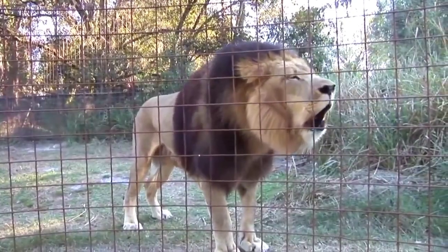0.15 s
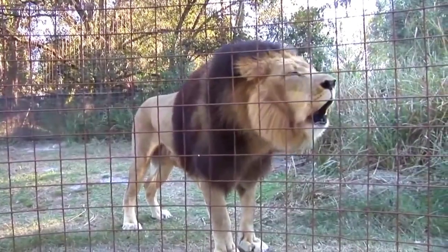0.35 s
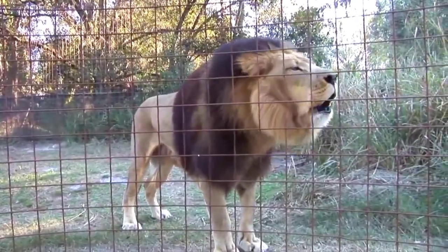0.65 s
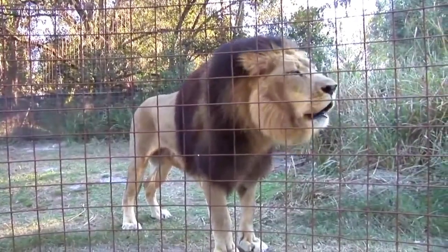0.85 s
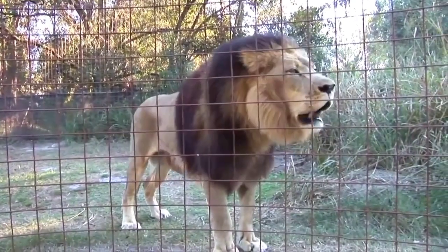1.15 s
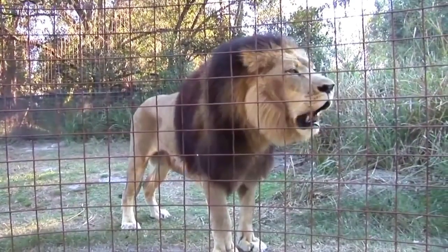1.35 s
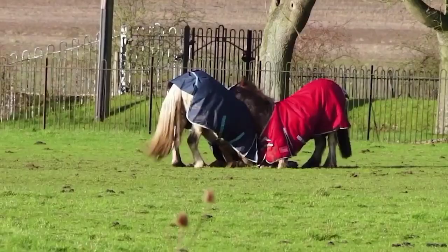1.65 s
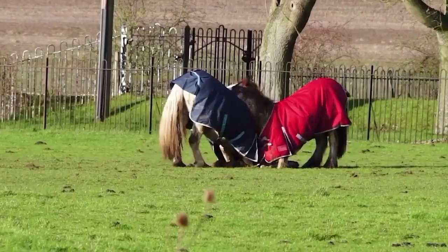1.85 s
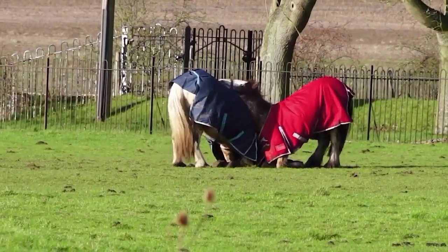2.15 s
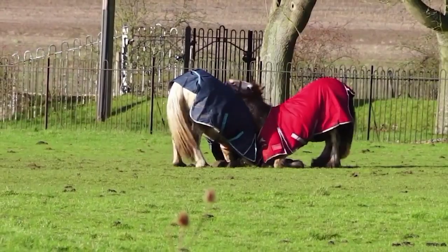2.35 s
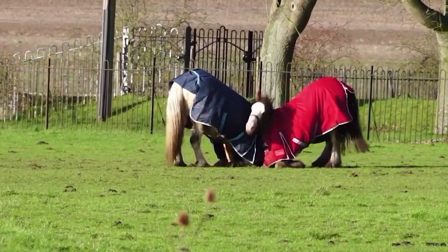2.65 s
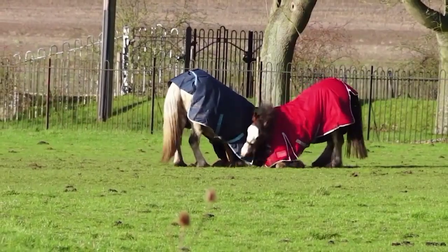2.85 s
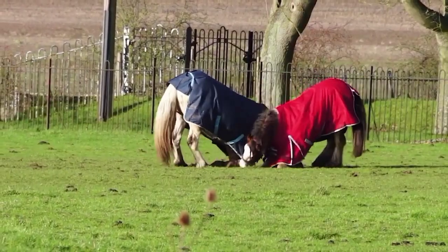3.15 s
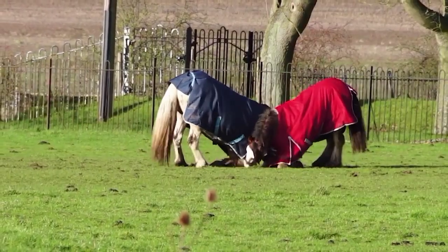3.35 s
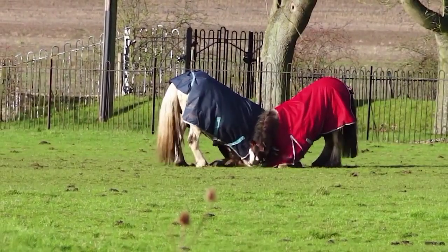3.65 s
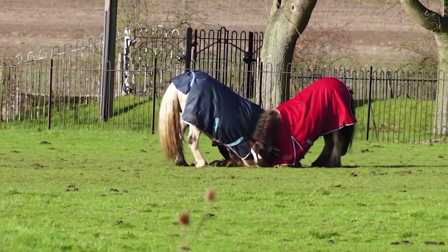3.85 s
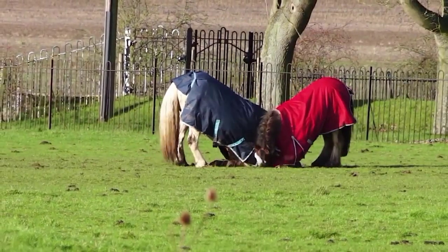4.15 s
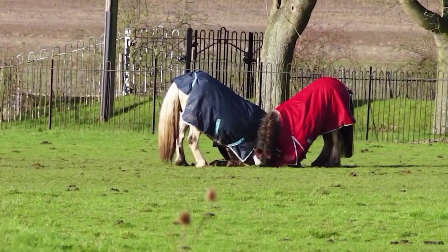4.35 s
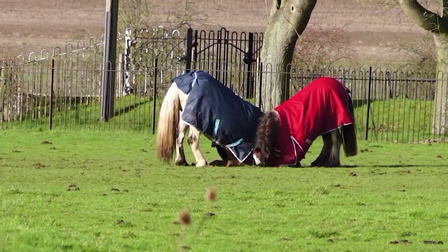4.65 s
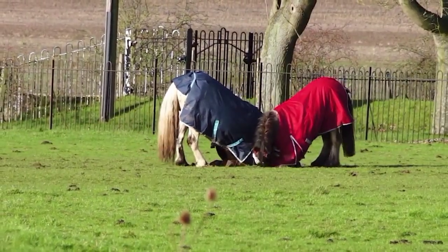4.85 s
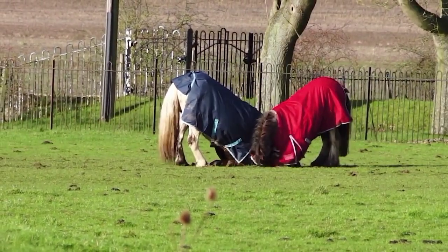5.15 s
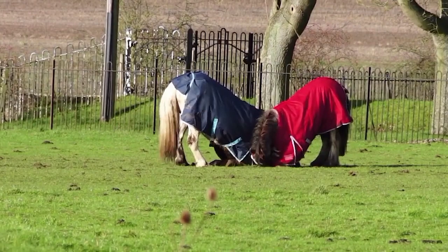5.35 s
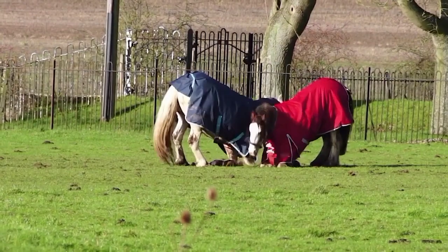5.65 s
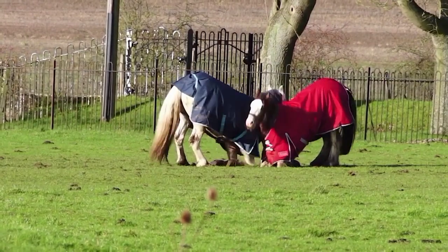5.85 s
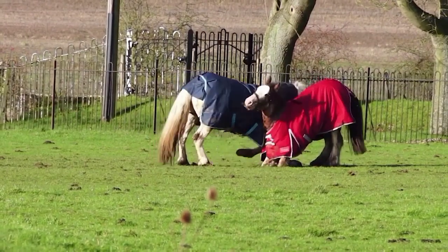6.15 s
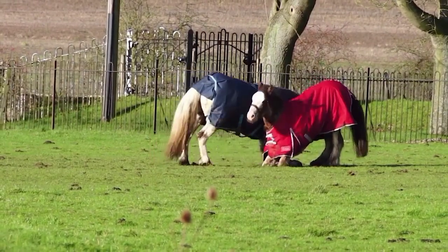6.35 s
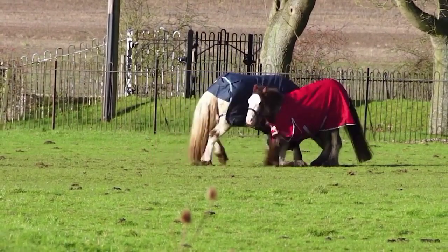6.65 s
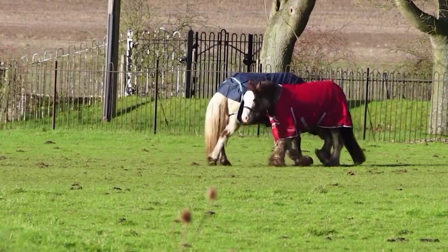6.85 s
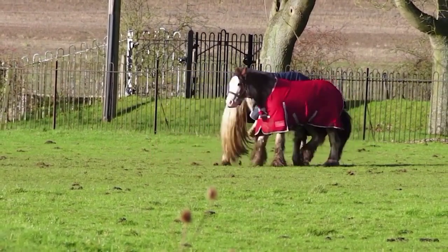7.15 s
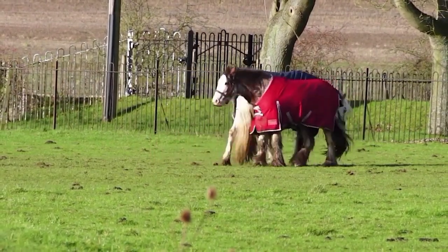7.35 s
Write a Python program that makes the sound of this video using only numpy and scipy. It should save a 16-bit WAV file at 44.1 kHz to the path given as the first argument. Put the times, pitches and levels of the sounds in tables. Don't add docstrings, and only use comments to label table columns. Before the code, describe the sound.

Close to the microphone, a lion ends a roar: deep groan and harsh rattling rasp, falling to a weak sigh over distant traffic. A sudden cut to an open paddock brings a rough, pulsing pony whinny with chest grunts, sinking as breath runs out. Dull hooves scuffle on turf and blankets rub, then a nostril-flapping snort and a higher, purer whinny that fades into quiet air.

```python
import sys
import numpy as np
from scipy import signal
from scipy.fft import rfft, irfft, next_fast_len
from scipy.io import wavfile
from scipy.ndimage import uniform_filter1d, map_coordinates

SR = 44100
rng = np.random.default_rng(int(sys.argv[2]) if len(sys.argv) > 2 else 0)


def amp(db):
    return 10 ** (np.asarray(db, float) / 20)


def write(x):
    x = np.atleast_2d(x).T
    wavfile.write(sys.argv[1], SR, np.round(np.clip(x, -1, 1) * 32767).astype(np.int16))


N = 330428
TIME = np.arange(N) / SR
CUT = 1.677

# frequency in Hz, likeness 0-1.
ALIKE = [(60, 0.75), (300, 0.84), (700, 0.65), (1400, 0.66), (3000, 0), (7000, 0.061)]


def lion():
    # time in seconds, pitch in Hz, level in dB.
    groan = [(0.0, 168.9, -27), (0.092, 181.9, -28), (0.22, 183.2, -36.5), (0.29, 186.6, -33.5),
             (0.406, 155.8, -28), (0.502, 153.4, -23), (0.6, 139.7, -15), (0.798, 109.6, -23),
             (0.9, 99.45, -61)]
    # multiple of the pitch, level in dB.
    overtones = [(2, -28), (3, -31.5), (4, -22)]
    # time in seconds, level in dB.
    heaves = [
        (0.255, -18.5),
        (0.348, -14),
    ]
    # time in seconds, level in dB.
    half_tone = [(0.3, -37.5), (0.366, -52.5), (0.452, -37), (0.596, -40.5), (0.684, -60.5), (0.716, -59),
                 (0.85, -78)]
    # time in seconds, pitch in Hz, level in dB.
    hoot_tone = [(0.0, 552.3, -11.5), (0.08, 572.6, -31), (0.098, 499.8, -20), (0.25, 499.4, -19),
                 (0.258, 462, -21), (0.294, 457, -25), (0.39, 525.2, -34), (0.4, 500.7, -31)]
    # time in seconds, pitch in Hz, level in dB.
    sigh = [(.67, 540, -46.5), (.7, 500, -31.5), (.735, 430, -25.5), (.76, 410, -53.5)]
    # time in seconds, level in dB.
    rasp_effort = [(0.0, -25), (0.092, -21.5), (0.21, -26.5), (0.282, -19.5), (0.32, -33), (0.36, -30),
                   (0.52, -29.5), (0.72, -31), (0.9, -74)]
    # time in seconds, level in dB.
    surges = [(0.079, -13), (0.127, -18), (0.158, -24.5), (0.196, -24.5), (0.252, -34), (0.341, -23),
              (0.456, -27.5), (0.494, -32), (0.543, -36), (0.643, -43), (0.712, -35.5)]
    # time in seconds, level in dB.
    closures = [(0.0603, -12), (0.0758, -12), (0.0926, -23.5), (0.118, -8), (0.1541, -14.5), (0.193, -5.5),
                (0.2503, -10), (0.27, -16), (0.3346, -17.5), (0.4247, -21), (0.4518, -22.5), (0.7043, -17)]
    # time in seconds, mouth over throat in dB.
    lips = [(.28, -7.5), (.33, -1.5), (.62, -2.6), (.7, -9.5)]
    # time in seconds, level in dB.
    gape = [(0, -0.5), (.06, -6.5), (.12, 4), (.3, -2), (.4, -1.5), (.75, -2.5)]
    # frequency in Hz, width in Hz, level in dB.
    throat = [(203, 150, -6), (340, 260, -6.5), (524, 38, -1.5), (852, 46, -10)]
    # frequency in Hz, width in Hz, level in dB.
    open_jaw = [(1033, 99, -1), (1169, 110, 3)]
    # frequency in Hz, width in Hz, level in dB.
    gaping_mouth = [(1630, 230, 0.5), (2150, 73, 0), (2290, 61, 4.5), (3027, 65, -2.5), (3466, 570, -10),
                    (5130, 250, -20.5)]
    # frequency in Hz, width in Hz, level in dB.
    closing_mouth = [(1580, 200, -1), (1846, 160, 2), (2220, 160, 1.5), (3000, 260, -5), (3400, 98, -1),
                     (3910, 400, -6.5), (5150, 730, -14)]

    def throat_ring(f):
        return modes(throat)(f) / (1 + (f / 1000) ** 8) / (1 + (170 / (f + 1)) ** 4)

    def jaw_ring(f):
        return modes(open_jaw)(f) / (1 + (f / 1330) ** 12) / (1 + (930 / (f + 1)) ** 8)

    def mouth_ring(mouth):
        notch = lambda f: 1 + (60 / (f - 4550.5)) ** 2
        band = lambda f: (1 + (f / 5700) ** 30) * (1 + (1550 / (f + 1)) ** 10)
        return lambda f: modes(mouth)(f) / band(f) / notch(f)

    hz, groan_db = curves(groan)
    throat_db, = curves(rasp_effort)
    mouth_db = throat_db + curves(lips)[0]
    effort = amp(groan_db) + sum(amp(db) * np.exp(-((TIME - s) / 0.016) ** 2) for s, db in heaves)
    held = effort * during(groan)
    chest = tone(hz, 0.46 * wobble(31), jitter=0.18) * held
    for multiple, db in overtones:
        chest = chest + tone(multiple * hz, db + 4 * wobble(30), jitter=0.46) * held
    half = tone(hz / 2.24, curves(half_tone)[0], jitter=0.37) * during(half_tone)
    hoot = tone(*curves(hoot_tone), jitter=0.58) * during(hoot_tone)
    hoot = hoot + tone(*curves(sigh), jitter=0.59) * during(sigh)

    surge = swells(surges, width=0.008, valley_db=-3.0) * during(rasp_effort)
    folds = patched(pulses(hz, scatter=.4, size_db=3.0, breath=2.0), patchy_db=3.0)
    rings = unit(filtered(folds, throat_ring))
    rings = rings + amp(curves(gape)[0] - 5.5) * unit(filtered(folds, jaw_ring))
    rasp = amp(throat_db + 2.5) * surge * rings
    slaps = np.zeros(N)
    slap_s, slap_db = np.transpose(closures)
    slaps[np.round(slap_s * SR + 90).astype(int)] = amp(slap_db + 37.5)
    slap_ring = lambda f: (amp(5) * modes(open_jaw)(f) + modes(throat)(f)) / (1 + 1j * f / 1700) ** 4
    rasp = rasp + filtered(slaps, slap_ring)

    air = patched(pulses(hz, scatter=.3, size_db=2, breath=8), patchy_db=2)
    shut = np.interp(TIME, [.3, .5], [0, 1])
    opened = np.sqrt(1 - shut) * unit(filtered(air, mouth_ring(gaping_mouth)))
    closed = np.sqrt(shut) * unit(filtered(air, mouth_ring(closing_mouth)))
    hiss = amp(mouth_db + 0.5) * surge ** 0.51 * (opened + closed)

    lean_db = np.interp(TIME, [.05, .17, .36, .44], [1.5, -7.0, -5.0, 0.0])
    body = placed(chest + half, .35 * lean_db, -23.5)
    voice = placed(hoot * surge ** 0.37 + rasp, lean_db, -15.5)
    return body + voice + placed(hiss, -.2, -13.5)


def first_whinny():
    # time in seconds, high voice in Hz, low voice in Hz.
    pitch = [(1.68, 1242, 468.6), (1.82, 1255, 432.1), (1.9, 1358, 491.5), (1.97, 1325, 487.6),
             (2.06, 1285, 482), (2.085, 1248, 322.6), (2.185, 1289, 317.1), (2.205, 1148, 427.7),
             (2.26, 1141, 439.2), (2.353, 1131, 422.7), (2.47, 1048, 389), (2.8, 923, 363.4)]
    # time in seconds, voice in dB, breath in dB, depth of the low voice 0-1.
    effort = [(1.677, -39.5, -42.5, 0.8), (1.9, -30.5, -24, .9), (2.02, -32, -25, 0.85),
              (2.25, -35.5, -36, 0.6), (2.38, -39.5, -39.5, .75), (2.5, -39.5, -50, .75),
              (2.7, -60.5, -59, .9), (2.95, -69, -53, .6)]
    # time in seconds, level in dB.
    throbs = [(1.699, -38), (1.792, -35), (1.905, -31), (2.007, -33.5), (2.126, -33.5), (2.236, -35.5),
              (2.353, -38), (2.451, -45), (2.555, -45.5), (2.62, -47.5), (2.683, -37.5), (2.74, -50)]
    # frequency in Hz, level in dB.
    throat = [(240, -44.5), (400, -1), (798, -22.5), (957, -7), (2090, -7), (2260, -10.5), (2580, -7),
              (2900, -13.5), (3910, -9.5), (4630, -16.5), (6400, -25.5), (9000, -36.5), (11700, -56.5),
              (19800, -120)]
    # frequency in Hz, width in Hz, level in dB.
    nasal = [(1600, 220, 7.8), (2250, 90, 0.79)]
    # time in seconds, frequency in Hz, lift in dB.
    mouth = [(1.7, 1860, 11), (1.78, 1630, 9), (1.8, 2367, 2), (1.85, 2450, 5.5), (1.898, 2273, 14.5),
             (2.02, 2084, 4), (2.13, 2537, 7), (2.2, 1570, 6), (2.245, 3560, 12.5), (2.35, 2245, 8.5),
             (2.46, 1045, 5.5)]
    # time in seconds, factor.
    ragged = [(1.68, 1.2), (1.87, .6), (2.4, .5), (2.55, 1.6)]
    valley_db = np.interp(TIME, [1.72, 1.86, 2.4, 2.55], [-3, -12, -11, -5])
    call = whinny(pitch, effort, throbs, throat, nasal, mouth, ragged, .034, valley_db, arch=.045)
    return placed(call, -1.4, -13.5)


def second_whinny():
    # time in seconds, high voice in Hz, low voice in Hz.
    pitch = [(5.9, 1600, 521.2), (5.99, 1652, 522.5), (6.005, 1565, 505.8), (6.04, 1545, 502),
             (6.068, 1640, 498.2), (6.11, 1672, 488), (6.16, 1711, 495.5), (6.225, 1900, 627),
             (6.28, 1858, 599.7), (6.34, 1788, 591), (6.388, 1835, 596.7), (6.402, 1590, 563.7),
             (6.47, 1592, 583), (6.515, 1560, 546.5), (6.55, 1768, 605), (6.64, 1617, 620),
             (6.74, 1572, 599.8), (6.83, 1410, 563.7), (6.92, 1411, 523.5), (7.02, 1290, 480.5),
             (7.25, 1200, 448)]
    # time in seconds, voice in dB, breath in dB, depth of the low voice 0-1.
    effort = [(5.88, -83, -86.5, .02), (5.93, -57, -75.5, 0.017), (6.035, -51.5, -69.5, .02),
              (6.065, -58, -56, 0.046), (6.11, -52.5, -39.5, 0.46), (6.16, -49.5, -36.5, 0.5),
              (6.32, -46.5, -44.5, 0.84), (6.461, -42, -24.5, 0.7), (6.75, -42.5, -44, 0.32),
              (7.04, -59, -52, 0.51), (7.2, -85, -69, .7), (7.34, -90, -79.5, 1)]
    # time in seconds, level in dB.
    throbs = [(6.213, -35), (6.301, -41), (6.382, -41.5), (6.435, -41.5), (6.475, -39.5), (6.549, -38.5),
              (6.633, -43), (6.724, -46), (6.813, -47), (6.904, -49), (7.01, -52.5), (7.081, -62),
              (7.17, -57.5), (7.26, -47.5)]
    # frequency in Hz, level in dB.
    throat = [(260, -59), (450, -10.5), (583, 1.5), (709, -12), (1320, -11), (1850, -5), (2530, -7),
              (2900, -11), (3400, -9), (4200, -10), (5300, -8), (6500, -15), (10000, -25), (13000, -63.5),
              (22000, -120)]
    # frequency in Hz, width in Hz, level in dB.
    nasal = [(2230, 110, 5.3), (2730, 52, 7.8)]
    # time in seconds, frequency in Hz, lift in dB.
    mouth = [(5.92, 1610, -4), (5.95, 1630, 7.5), (5.97, 3290, 7), (6.0, 3200, -7.5), (6.03, 3100, -26),
             (6.055, 3200, -5.5), (6.11, 3470, 22.5), (6.125, 4990, 3.5), (6.16, 5150, 13),
             (6.18, 3600, 0.5), (6.22, 1880, 13.5), (6.38, 2410, 5), (6.39, 3400, -10.5), (6.41, 2150, 5),
             (6.46, 2076, 12.5), (6.55, 2410, 1.5), (6.65, 2710, 13), (6.73, 3270, 11.5),
             (6.83, 1960, 11.5), (6.92, 2810, 10.5), (7.02, 1270, 8.5), (7.17, 2290, 11)]
    # time in seconds, factor.
    ragged = [(5.9, .35), (6.12, .5), (6.19, .9), (6.25, 2), (6.5, 2.2), (6.57, 1), (6.63, .6)]
    # time in seconds, frequency in Hz, level in dB.
    whistle = [(6.08, 2805, -67.5), (6.16, 2753, -60), (6.245, 2830, -50), (6.31, 2790, -66.5),
               (6.38, 2975, -49), (6.42, 2690, -57), (6.47, 2940, -43.5), (6.51, 2830, -53.5),
               (6.56, 2834, -41.5), (6.6, 2810, -73)]
    valley_db = np.interp(TIME, [6.17, 6.5, 6.58, 7, 7.06], [-.1, -5, -13, -13, -5])
    call = whinny(pitch, effort, throbs, throat, nasal, mouth, ragged, .027, valley_db, arch=.04)
    sung = tone(*curves(whistle), jitter=2.0) * amp(2.3 * wobble(40)) * during(whistle)
    return placed(call + sung, -1.3, -11.5)


def whinny(pitch, effort, throbs, throat, nasal, mouth, ragged, width, valley_db, arch):
    a, b = round(effort[0][0] * SR), round(effort[-1][0] * SR)
    span = TIME[a:b]
    waver = lambda rate: wobble(rate, size=b - a)
    push = swells(throbs, width, valley_db)
    voice_db, breath_db, depth = curves(effort)
    depth = depth[a:b]
    tired = np.clip((voice_db.max() - voice_db - 4.5) / 12, 0, 1) * (TIME > throbs[2][0])
    breath_db = np.minimum(breath_db, np.maximum(voice_db + .5, voice_db.max() - 8))

    lift = 1 + arch * (np.minimum(push, 1) - 1)
    high_hz, low_hz = [(hz * lift)[a:b] * (1 + 0.00699 * waver(22)) for hz in curves(pitch)]
    rough, = curves(ragged, span)
    torn = np.maximum(rough - 1, 0)
    high_turn = 2 * np.pi * np.cumsum(high_hz) / SR
    high_turn = high_turn + rough * (.48 * waver(70) + .5 * waver(30)) + .35 * torn * waver(220)
    low_turn = 2 * np.pi * np.cumsum(low_hz) / SR + 0.55 * rough * waver(70)
    mouth_hz, mouth_db = curves(mouth, span)

    lines, power = np.zeros(N), np.ones(N)
    for m in range(6):
        for n in range(1, 6) if m == 0 else range(-2, 3):
            hz = m * high_hz + n * low_hz
            line_db = 4.4 * np.minimum(rough, 1.3) * waver(38) - 1.2 * m * (1 - depth + torn)
            line_db = line_db + mouth_db * np.exp(-((hz / mouth_hz - 1) / 0.04) ** 2)
            share = 1.15
            if n:
                share = np.clip(depth, 0, 1) * (0.96 ** abs(n) if m else .85)
            swing = push[a:b] ** np.clip(hz / 1500, .5, 1.8)
            size = share * amp(along(throat, hz) + line_db - 9 * tired[a:b] * hz / 1000 + 41.0)
            power[a:b] += size ** 2 / 2
            turn = m * high_turn + n * low_turn + 2 * np.pi * rng.random()
            lines[a:b] += size * swing * np.sin(turn)
    voice = amp(voice_db) * lines / np.sqrt(power)
    breath = amp(breath_db) * whinny_breath(throat, nasal, push, ragged, tired)
    return during(effort) * (voice + breath)


def whinny_breath(throat, nasal, push, ragged, tired):
    def passage(f):
        rings = sum(np.abs(modes([ring])(f)) ** 2 for ring in nasal)
        return amp(along(throat, f)) * (1 + rings) ** .5

    breath = unit(filtered(rng.standard_normal(N), passage)) * amp(1.5 * wobble(70))
    treble = filtered(breath, lambda f: 1 / (1 + (2400 / (f + 1)) ** 4))
    breath = breath - .75 * tired * treble
    return breath * push ** 1.3 * amp(-12 + 5 * np.minimum(curves(ragged)[0], 1.4))


def grunts():
    # start in seconds, length in seconds, level in dB.
    held = [
        (1.68, .075, -33),
        (1.8, 0.16, -38),
        (2.05, 0.019, -41),
        (2.18, .45, -38),
        (6.765, 0.41, -55),
    ]
    # start in seconds, length in seconds, level in dB.
    tail = [
        (2.581, 0.43, -46.5),
        (7.2, 0.33, -71.5),
    ]
    # time in seconds, level in dB, mouth ring over chest in dB.
    knocks = [(1.684, -17, -13), (1.699, -23, 4), (1.718, -26, 3), (1.736, -23.5, 5.5), (1.754, -27, -12.5),
              (1.805, -25.5, -11.5), (1.82, -20, -8.5), (1.836, -21.5, -12.5), (1.875, -34, -12)]
    # frequency in Hz, width in Hz, level in dB.
    chest = [(173, 120, -1), (482, 96, 3), (1240, 1400, -6.5)]
    # frequency in Hz, width in Hz, level in dB.
    open_mouth = [(1100, 350, -0.5)]
    fall_db_s = 226.5
    gain = bursts(held, 0.005, 12, fall_db_s) + bursts(tail, 0.035, 60, fall_db_s)
    low = lambda f: modes(chest)(f) / (1 + 1j * f / 500) / (1 + (np.sqrt(6000) / (f + 1)) ** 6)
    slack = np.interp(TIME, [1.9, 2.2], [1.5, 1.1])
    air = unit(pulses(64, scatter=.4, size_db=-8.0, breath=2.4)) + slack * rng.standard_normal(N)
    rumble = gain * amp(2.0) * unit(filtered(air / np.sqrt(1 + slack ** 2), low))

    chest_blows, mouth_blows = np.zeros((2, N))
    for s, db, ring_db in knocks:
        chest_blows[round(s * SR)] = amp(db + 28.0)
        mouth_blows[round(s * SR)] = amp(db + ring_db + 24.5)
    mouth_knock = lambda f: amp(8.5) * modes(open_mouth)(f) ** 2 / (1 + 1j * f / 2500)
    chest_knock = lambda f: modes(chest)(f) * 1j * f / (90 + 1j * f) / (1 + 1j * f / 1900) ** 3
    knocking = filtered(mouth_blows, mouth_knock) + filtered(chest_blows, chest_knock)
    lean_db = np.interp(TIME, [1.9, 2.15], [5.5, -2.5])
    return placed(rumble + knocking, lean_db, -10.5)


def snort():
    # time in seconds, level in dB.
    blow = [(5.462, -49), (5.472, -44), (5.485, -41), (5.58, -39.5), (5.59, -38), (5.746, -40.5),
            (5.862, -41), (6.0, -69.5)]
    # time in seconds, level in dB.
    flaps = [(5.481, -37.5), (5.51, -34), (5.535, -26.5), (5.572, -26), (5.608, -34.5), (5.647, -36.5),
             (5.692, -36.5), (5.714, -34), (5.757, -33.5), (5.798, -37), (5.852, -40), (5.902, -30)]
    # frequency in Hz, level in dB.
    nose = [(29, -48), (50, -21), (203, 1.5), (418, -5), (639, -1.5), (726, -2), (807, 0.5), (977, -2),
            (1810, -14.5), (2330, -13), (3210, -24), (8000, -26.5), (10400, -17.5), (17600, -120)]
    air = filtered(pulses(140, scatter=.6, size_db=1.5, breath=20), lambda f: amp(along(nose, f)))
    gain = amp(curves(blow)[0] + 2.5) * swells(flaps, width=0.0084, valley_db=-9.5) * during(blow)
    return placed(gain * unit(air), 1.6, -2.5)


def hooves():
    # time in seconds, level in dB, pitch in Hz.
    steps = [(3.369, -36.5, 517), (3.412, -31, 473), (3.482, -31.5, 494), (3.499, -37, 324),
             (3.551, -40, 340), (3.677, -27.5, 222), (3.775, -25.5, 570), (3.896, -32.5, 490),
             (3.96, -31, 324), (4.003, -35.5, 451), (4.198, -42.5, 554), (4.316, -32, 452),
             (4.34, -33, 340), (4.543, -38.5, 1100), (5.06, -31.5, 366)]
    # time in seconds, turf level in dB.
    settling = [
        (2.7, -54.5),
        (3.9, -56),
        (5.5, -60.5),
    ]
    # start in seconds, length in seconds, level in dB.
    stirs = [
        (2.7, 0.01, -39.5),
        (3.485, 0.008, -51.5),
        (3.86, 0.054, -58.5),
        (4.6, 0.078, -56.5),
        (5.47, .02, -68),
    ]
    # start in seconds, length in seconds, level in dB.
    rubs = [
        (3.482, .035, -50),
        (3.555, 0.033, -53.5),
        (3.775, .03, -62),
        (5.465, .03, -49),
    ]
    # frequency in Hz, level in dB.
    turf_colour = [(35, -80.5), (60, -69.5), (93, -12), (123, 3), (171, -4), (480, -2), (823, -10),
                   (1280, -10), (3000, -28), (3900, -60), (6600, -120)]
    # frequency in Hz, level in dB.
    cloth_colour = [(1000, -14.5), (1800, -5), (3000, -5.5), (5000, -16.5), (7500, -24.5)]
    thuds, t = np.zeros(N + SR), np.arange(SR // 10) / SR
    for s, db, hz in steps:
        push = np.sin(2 * np.pi * hz * t) * amp(-60 * t / 0.025)
        soft = signal.butter(2, [150, np.clip(1.94 * hz, 400, 4000)], "band", fs=SR)
        puff = signal.lfilter(*soft, rng.standard_normal(len(t))) * amp(-60 * t / 0.047)
        thuds[round(s * SR):][:len(t)] += amp(db - 6.0) * (push + 3.27 * puff) * np.minimum(t / 0.0017, 1)
    bed = amp(curves(settling)[0])
    turf = bed + bursts(stirs, 0.0056, 0, 111)
    cloth = bed * amp(-11) + bursts(rubs, 0.015, 0, 300)
    shuffle = turf * amp(3.6 * wobble(30)) * rush(turf_colour, ALIKE, patchy_db=0.5)
    rustle = cloth * amp(0.49 * wobble(33)) * rush(cloth_colour, ALIKE, patchy_db=1.5)
    return placed(thuds[:N], -4.0, -10.0) + (shuffle + rustle) * during(settling) * amp([[-2], [2]])


def background(animals):
    # frequency in Hz, level in dB.
    park_colour = [(15, -50), (25, -30.5), (103, -11.5), (191, -17.5), (326, -35), (1090, -36), (1240, -30),
                   (1810, -39), (3180, -46.5), (4150, -49.5), (6540, -53.5), (15000, -73)]
    # frequency in Hz, level in dB.
    field_colour = [(60, -42.5), (110, -6), (500, 0.5), (1000, -6), (2000, -14.5), (4500, -18), (7000, -39)]
    # time in seconds, level in dB.
    field_db = [(1.677, -120), (1.678, -49), (6.902, -63.5), (7.199, -83), (7.42, -77.5), (7.49, -100)]
    park = rush(park_colour, [(100, 1.0), (3000, 0.39)], patchy_db=2.5, size=2 * SR)
    park = amp(-59.5 + 1.3 * wobble(26)) * (TIME < CUT) * park
    air = amp(curves(field_db)[0])
    field = air * rush(field_colour, ALIKE, patchy_db=4.5)
    return park + field + fizz(animals, air)


def fizz(animals, air):
    # frequency in Hz, level in dB.
    park_fizz = [(6000, -31.5), (7500, 2.5), (9800, -2.5), (11000, -3.5), (15400, -4)]
    # frequency in Hz, level in dB.
    field_fizz = [(2940, -64), (5000, 8), (7870, 8.5), (9620, 8.5), (12300, 8.5), (14500, 10), (15450, 4.5)]
    # time in seconds, fizz in dB.
    lean = [(5.4, -1), (5.47, 5.5), (5.65, 4), (5.9, 1), (6.1, 3), (6.35, -0.5), (6.5, -4.5), (7.1, -6)]
    over_park = rush(park_fizz, [(9000, .6), (11000, -.1)], patchy_db=-2.0, size=2 * SR)
    over_field = rush(field_fizz, [(6000, 0.13), (14000, 0.19)], patchy_db=1)
    hiss = np.where(TIME < CUT, over_park, over_field)
    middle = lambda f: 1 / (1 + (1610 / (f + 1)) ** 4) / (1 + (f / 1810) ** 2)
    bright = filtered(animals.mean(axis=0), middle)
    loud = np.abs(uniform_filter1d(bright ** 2, size=round(0.022 * SR))) ** (0.76 / 2)
    slow = amp(-22.5) * uniform_filter1d(loud, size=4000) ** 0.62 / (loud + 1e-9) ** 0.73
    quick = amp(-18.5 + curves(lean)[0]) * (TIME > CUT)
    follows = loud * np.where(TIME < CUT, slow, quick)
    level = follows + air * amp(-9) + amp(-83.5) * (TIME < CUT)
    return level * amp(0.88 * wobble(45) + 2.4 * wobble(300)) * hiss * amp([[-.7], [.7]])


def unit(x):
    return x / np.sqrt(np.mean(x ** 2) + 1e-20)


def along(points, hz):
    f, v = np.transpose(points)
    return np.interp(np.log(np.abs(hz) + 1), np.log(f + 1), v)


def curves(rows, t=TIME):
    s, *cols = np.transpose(rows)
    return [np.interp(t, s, c) for c in cols]


def during(rows):
    inside = (TIME > rows[0][0]) & (TIME < rows[-1][0])
    return uniform_filter1d(1. * inside, size=350, mode="nearest")


def wobble(rate, size=N):
    coarse = np.arange(0, size + 16, 16)
    knots = rng.standard_normal(int(size * rate / SR) + 5)
    return np.interp(np.arange(size), coarse, map_coordinates(knots, [coarse * rate / SR]))


def swells(events, width, valley_db):
    s, db = np.transpose(events)
    t = np.arange(0, N / SR, 1 / 1000)
    trend = np.interp(t, s, uniform_filter1d(db, size=3, mode="nearest"))
    bells = sum(amp(2 * d) * np.exp(-np.abs((t - c) / width) ** 2.8) for c, d in events)
    return np.sqrt(np.interp(TIME, t, bells / amp(2 * trend)) + amp(2 * valley_db))


def bursts(rows, attack_s, sag_db_s, fall_db_s):
    gain, t = np.zeros(N + SR), np.arange(SR) / SR
    for s, length, db in rows:
        level_db = db - sag_db_s * t - fall_db_s * np.maximum(t - length, 0)
        gain[round(s * SR):][:SR] += np.minimum(t / attack_s, 1) * amp(level_db)
    return gain[:N]


def filtered(x, response):
    n = x.shape[-1]
    m = next_fast_len(n + SR // 2)
    return irfft(rfft(x, m) * response(np.fft.rfftfreq(m, 1 / SR)), m)[..., :n]


def modes(table):
    ring = lambda f, c, w: 1j * f * w / (c * c - f * f + 1j * f * w)
    return lambda f: sum((-1) ** k * amp(db) * ring(f, c, w) for k, (c, w, db) in enumerate(table))


def tone(hz, db, jitter):
    return np.sqrt(2) * amp(db) * np.sin(2 * np.pi * np.cumsum(hz) / SR + jitter * wobble(50))


def pulses(rate, scatter, size_db, breath):
    turns = np.cumsum(rate * np.exp(scatter * wobble(60))) / SR
    clicks = np.diff(np.floor(turns), prepend=0) * amp(size_db * wobble(90))
    puffs = np.exp(-3 * (turns % 1)) * rng.standard_normal(N)
    return unit(clicks) + breath * unit(puffs)


def patched(x, patchy_db):
    z = signal.stft(x, nperseg=512)[2]
    field = uniform_filter1d(rng.standard_normal(z.shape[-2:]), size=5, axis=0)
    field = uniform_filter1d(field, size=6, axis=1)
    return signal.istft(z * amp(patchy_db * unit(field)), nperseg=512)[1][..., :x.shape[-1]]


def rush(spectrum, alike, patchy_db, size=N):
    pair = patched(rng.standard_normal((2, size), dtype=np.float32), patchy_db)
    turn = lambda hz: np.arccos(np.clip(along(alike, hz), -1, 1)) / 2
    mid, side = filtered(pair, lambda hz: amp(along(spectrum, hz)) * [np.cos(turn(hz)), np.sin(turn(hz))])
    return np.pad(unit(np.array([mid + side, mid - side])), [(0, 0), (0, N - size)])


def placed(x, pan_db, wet_db):
    # frequency in Hz, time to fall 60 dB in seconds.
    echo = [(200, 0.088), (2000, 0.34), (8000, 0.0087)]
    hz, t, z = signal.stft(rng.standard_normal((2, SR // 4)), SR, nperseg=256)
    tail = signal.istft(z * amp(-60 * t / along(echo, hz)[:, None]), SR, nperseg=256)[1]
    tail = np.float32(tail / np.linalg.norm(tail[0]))
    wet = signal.oaconvolve(np.float32(x[None]), tail, axes=1)[:, :N]
    return (x + amp(wet_db) * wet) * amp(np.array([[.5], [-.5]]) * pan_db)


def pocketed(x):
    # start in seconds, end in seconds, frequency in Hz, width in Hz, share lost 0-1.
    pockets = [
        (.12, .26, 2700, 180, .8),
        (0, .3, 1420, 90, .6),
        (1.74, 1.86, 2900, 150, .85),
        (1.76, 1.8, 950, 200, .5),
        (1.71, 1.77, 4900, 700, .5),
        (5.95, 6.05, 3900, 400, .6),
        (6.06, 6.24, 3080, 90, .8),
        (6.4, 6.52, 3600, 330, .6),
    ]
    for start, end, hz, width, share in pockets:
        a, b = round(start * SR), round(end * SR)
        band = filtered(x[:, a:b], lambda f: np.exp(-((f - hz) / width) ** 4))
        lost = np.clip(share, 0, 1) * signal.windows.tukey(b - a, .3) * band
        x = x - np.pad(lost, [(0, 0), (a, N - b)])
    return x


def scene():
    animals = lion() + first_whinny() + second_whinny() + grunts() + snort() + hooves()
    animals = pocketed(animals)
    return animals + background(animals)


def gapped_treble(x):
    # frequency in Hz, threshold in sigma.
    dropout = [(5000, 7), (8800, 1.2), (11000, 2.1), (15000, 2.6)]
    # time in seconds, frequency in Hz.
    kept = [(0, 9500), (.155, 10000), (.165, 8200), (.265, 7600), (.275, 9700), (.8, 9700)]
    hz, t, z = signal.stft(x, SR, nperseg=1024)
    row_hz, roaring = hz[:, None], t < kept[-1][0]
    chance = uniform_filter1d(rng.standard_normal((len(hz) // 9 + 1, len(t))), size=4, axis=1)
    chance = unit(np.repeat(chance, 9, axis=0)[:len(hz)])
    loud_db = 10 * np.log10(np.sum(np.abs(z) ** 2, axis=(0, 1)) + 1e-9) + 50
    lost = chance > along(dropout, hz)[:, None] - .04 * loud_db
    gap = (row_hz > 6150) & (row_hz < curves(kept, t)[0]) & roaring
    gap = gap & ((chance > -.45) | (row_hz < 8000))
    lost = np.where(roaring, chance > 2.3, lost) | gap
    return signal.istft(z * ~lost, SR, nperseg=1024)[1][:, :x.shape[1]]


def in_park(x, process):
    park = process((x * (TIME < CUT))[:, :2 * SR])
    return np.pad(park, [(0, 0), (0, N - 2 * SR)])[:, :N]


def top_cut(x):
    return signal.sosfilt(signal.butter(12, 15440, fs=SR, output="sos"), x)


def record(dry):
    # frequency in Hz, lead of the left in radians.
    port_turn = [(2000, 0.058), (4000, 1.03), (6500, 1.5), (8500, 2.4), (13000, 3.9)]

    def park_ports(f):
        lead = -2.0 / (1 + ((f - 4350) / 400) ** 2) + np.pi * np.clip((f - 5800) / 1000, 0, 1)
        return np.exp(1j * np.outer([.5, -.5], lead))

    field_ports = lambda f: np.exp(1j * np.outer([.5, -.5], along(port_turn, f)))
    park = in_park(dry, lambda x: filtered(x, park_ports))
    field = filtered(dry * (TIME >= CUT), field_ports)
    ports = np.where(TIME < CUT, park, field)
    thin = filtered(ports, lambda f: 1 / (1 + (76 / (f + 1)) ** 6))
    full_bass = (TIME < 2.9) | (np.abs(TIME - 5.72) < .26)
    full = np.where(full_bass, ports, thin)
    mix = np.where(TIME < CUT, in_park(full, gapped_treble), gapped_treble(full))
    mix = mix / (1 + np.abs(mix / 0.87) ** 4) ** (1 / 4)
    return top_cut(mix)


dry = scene()
out = record(dry)
write(out)
```